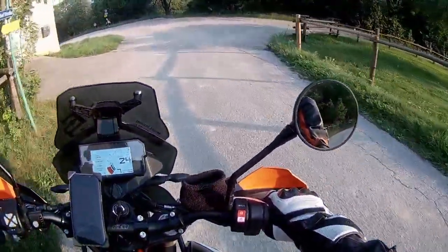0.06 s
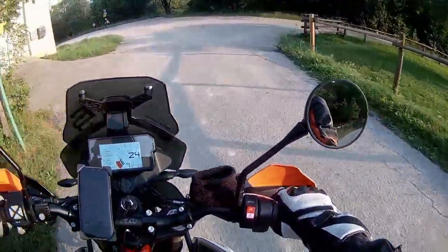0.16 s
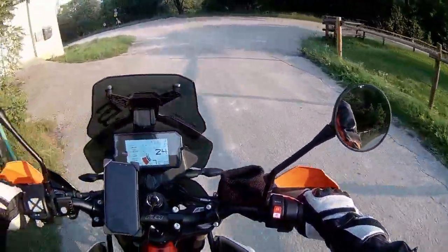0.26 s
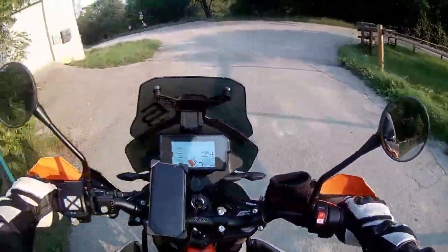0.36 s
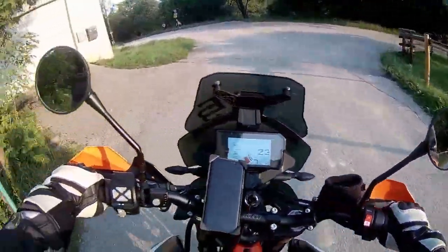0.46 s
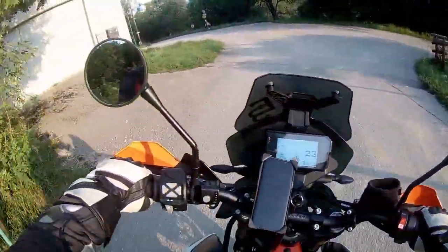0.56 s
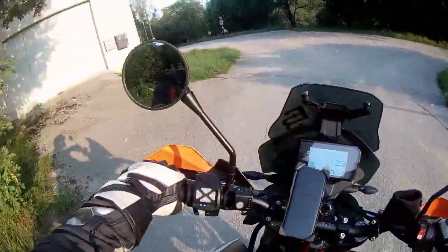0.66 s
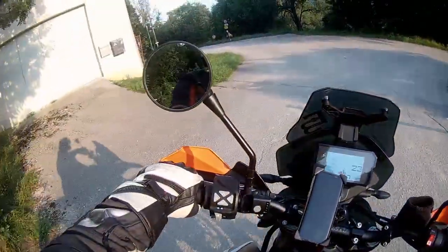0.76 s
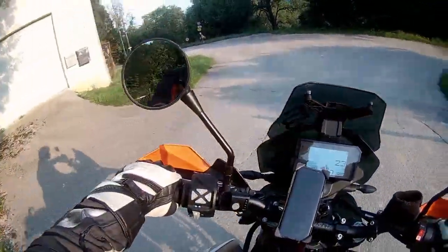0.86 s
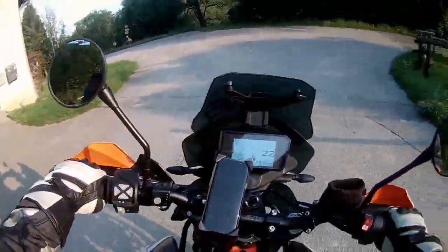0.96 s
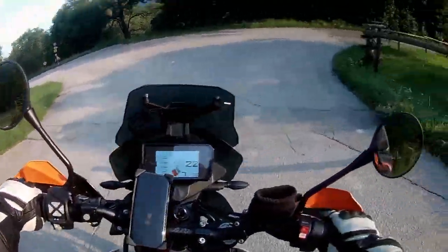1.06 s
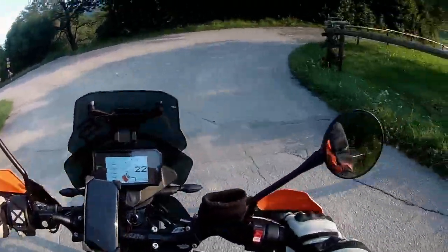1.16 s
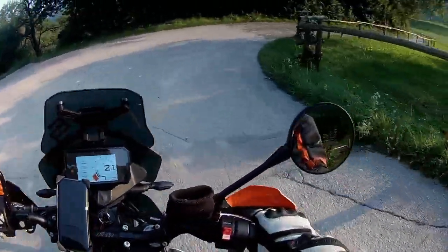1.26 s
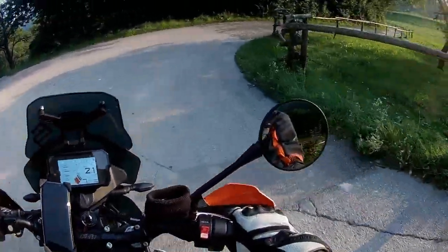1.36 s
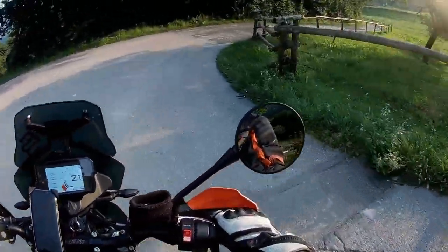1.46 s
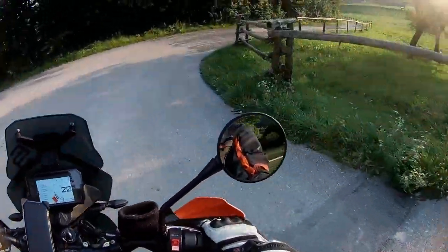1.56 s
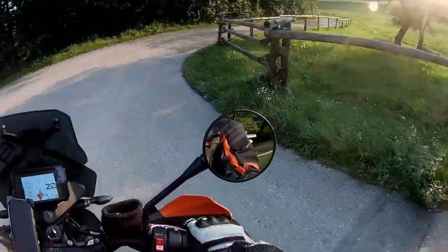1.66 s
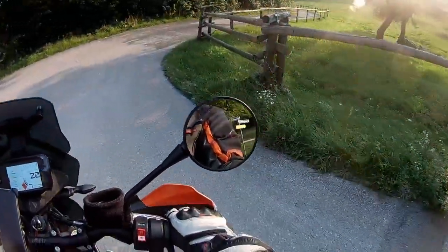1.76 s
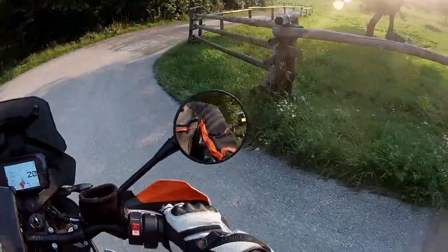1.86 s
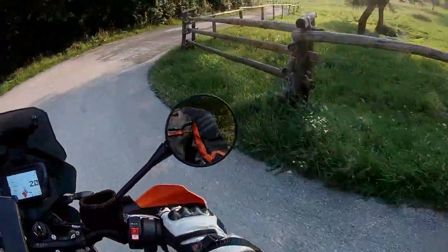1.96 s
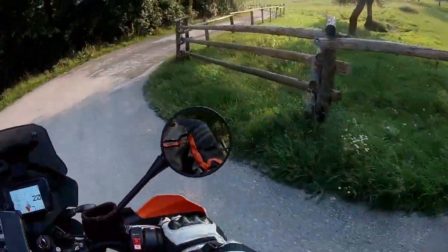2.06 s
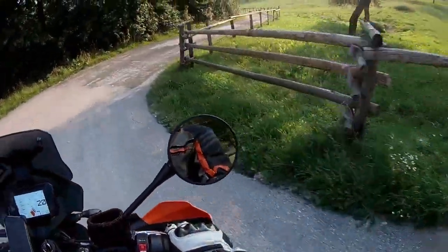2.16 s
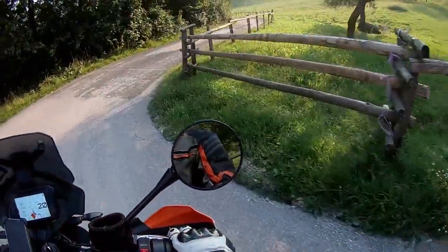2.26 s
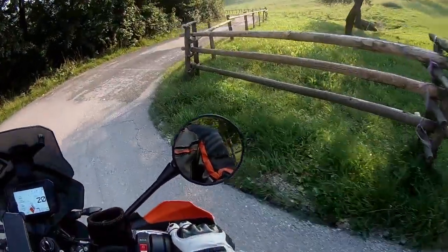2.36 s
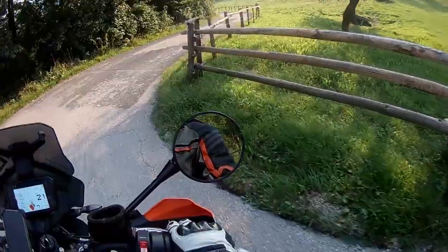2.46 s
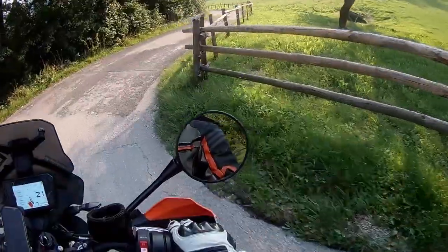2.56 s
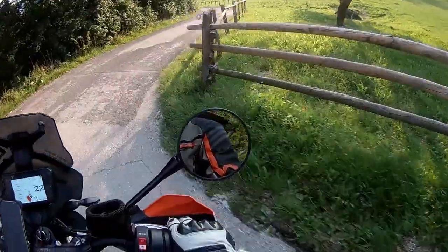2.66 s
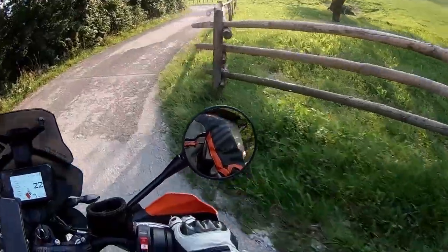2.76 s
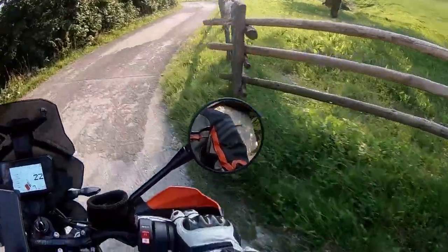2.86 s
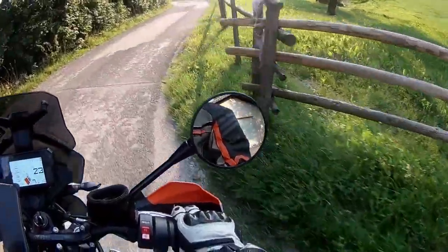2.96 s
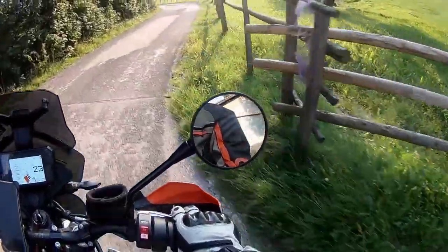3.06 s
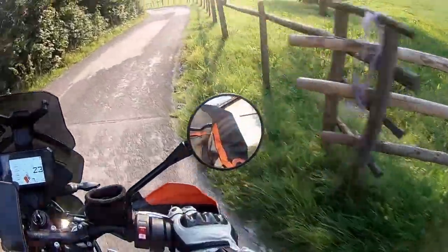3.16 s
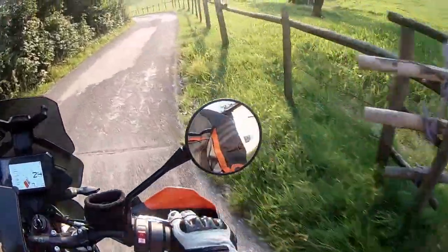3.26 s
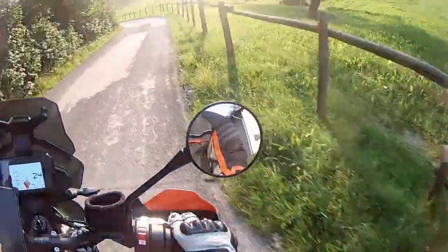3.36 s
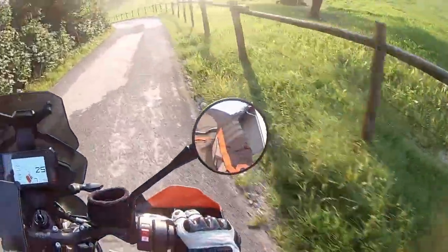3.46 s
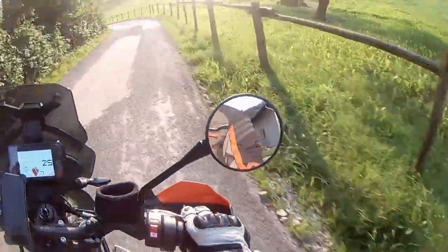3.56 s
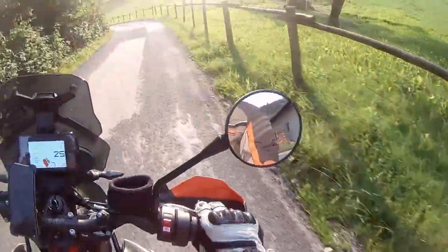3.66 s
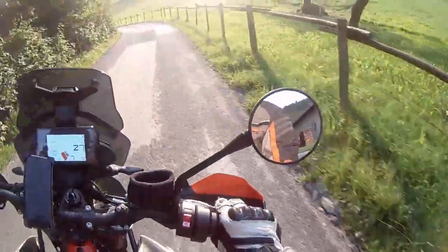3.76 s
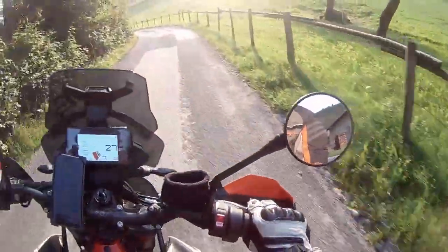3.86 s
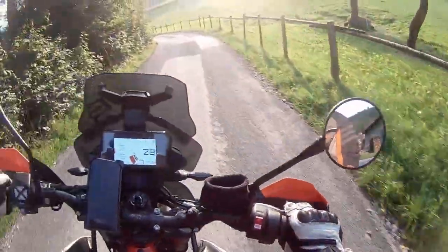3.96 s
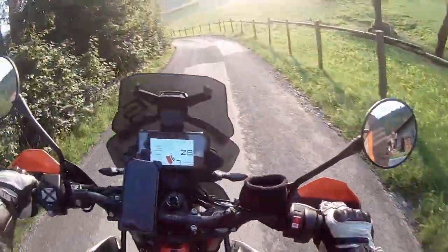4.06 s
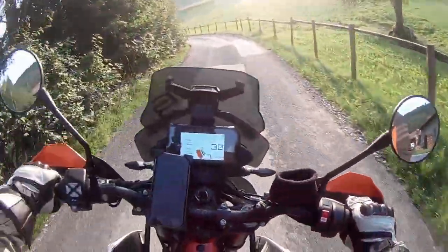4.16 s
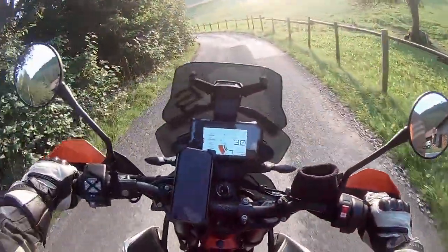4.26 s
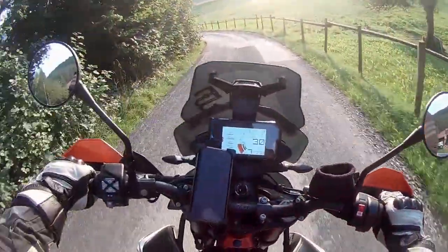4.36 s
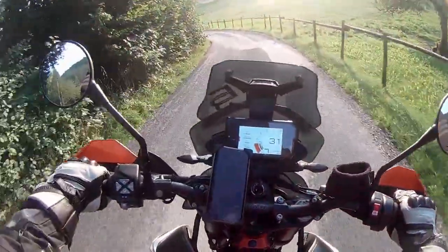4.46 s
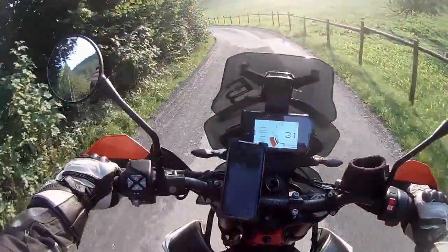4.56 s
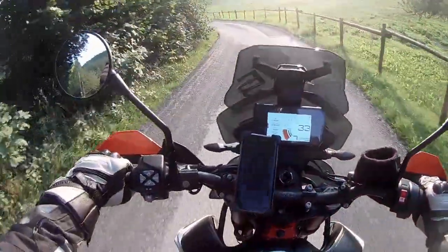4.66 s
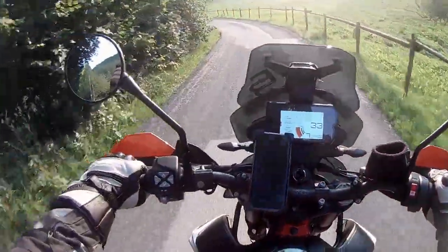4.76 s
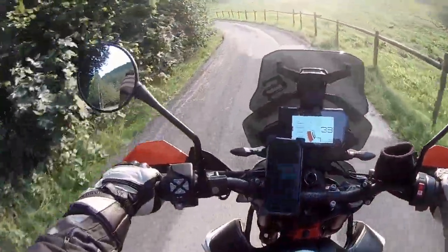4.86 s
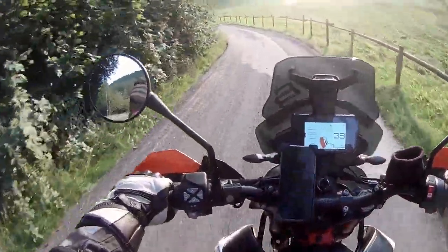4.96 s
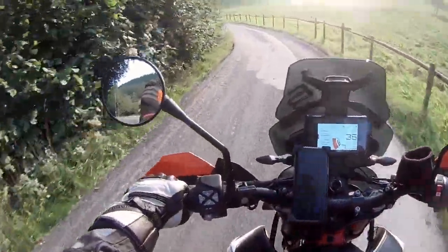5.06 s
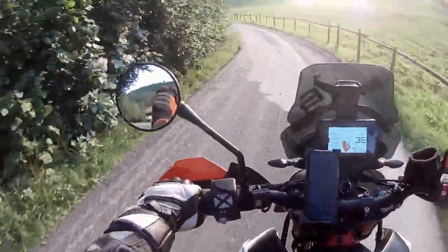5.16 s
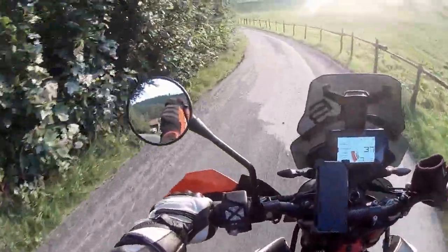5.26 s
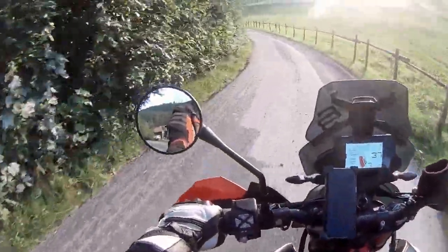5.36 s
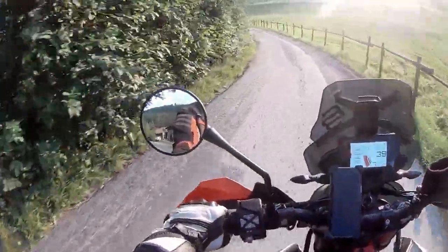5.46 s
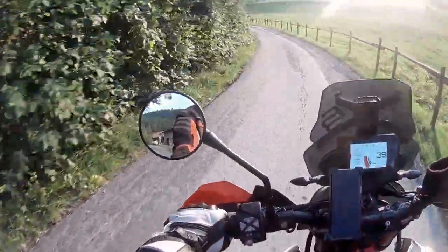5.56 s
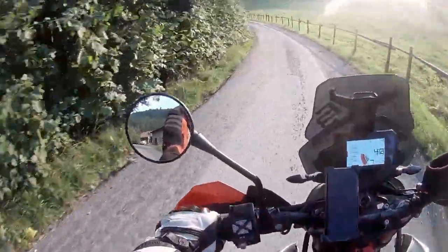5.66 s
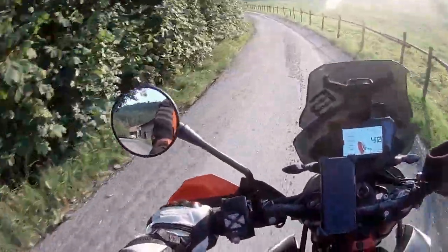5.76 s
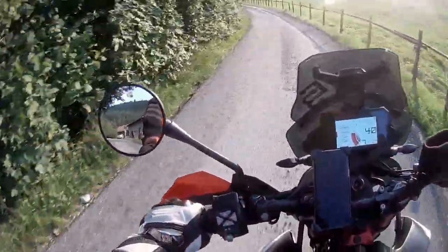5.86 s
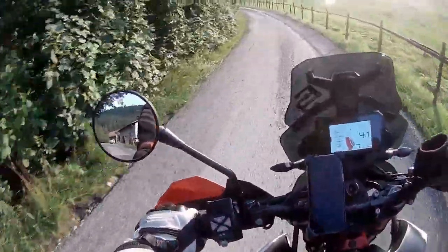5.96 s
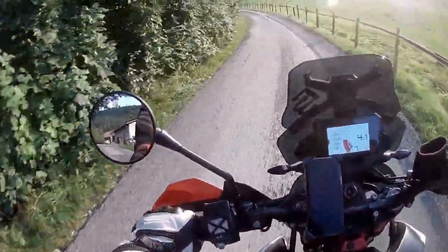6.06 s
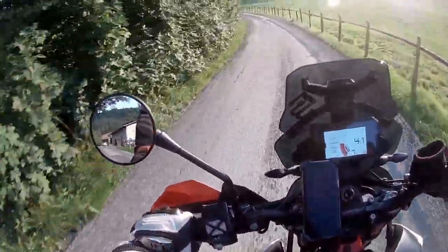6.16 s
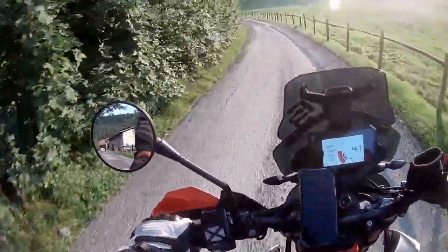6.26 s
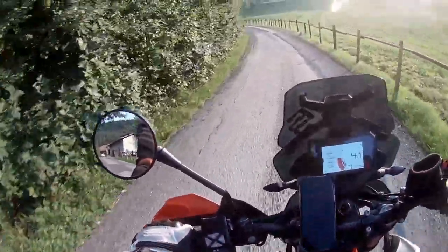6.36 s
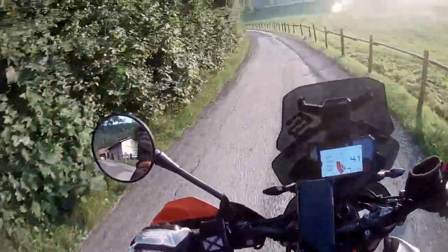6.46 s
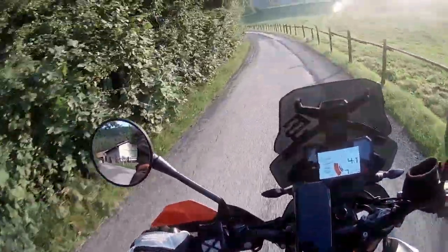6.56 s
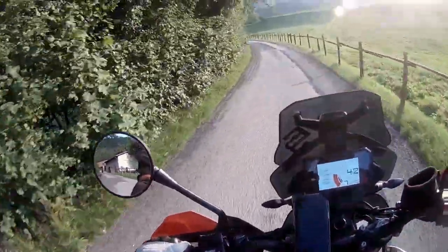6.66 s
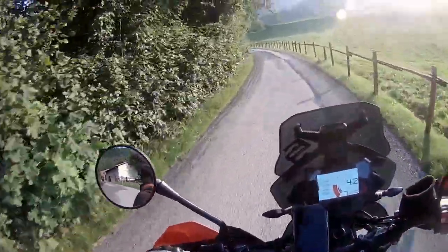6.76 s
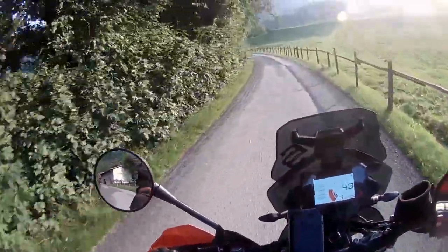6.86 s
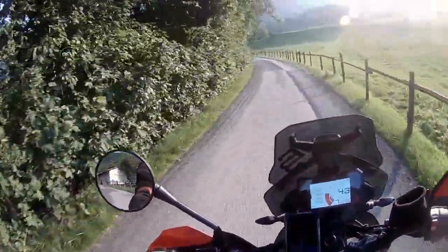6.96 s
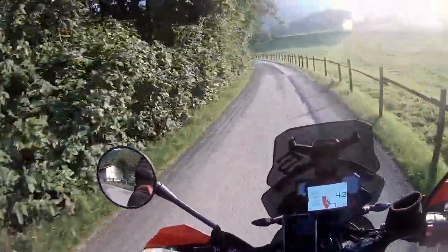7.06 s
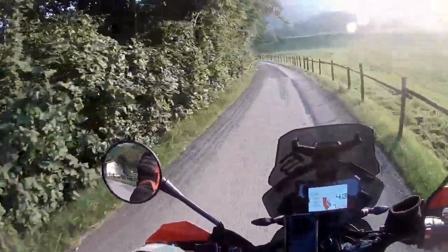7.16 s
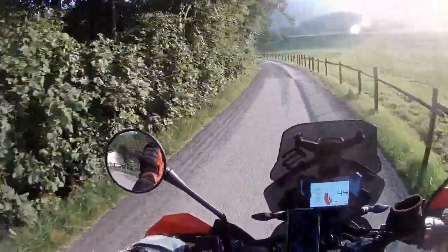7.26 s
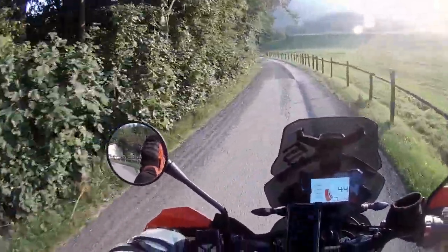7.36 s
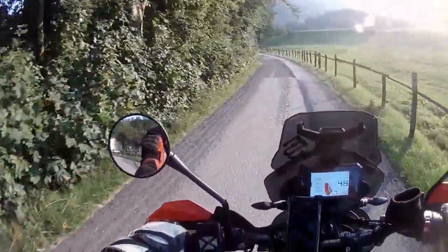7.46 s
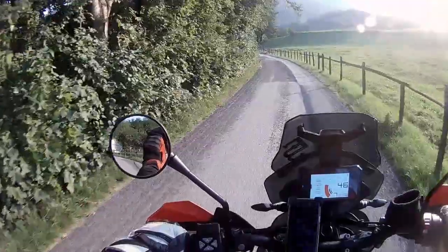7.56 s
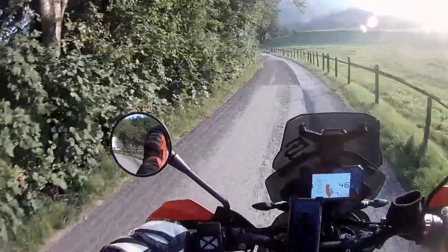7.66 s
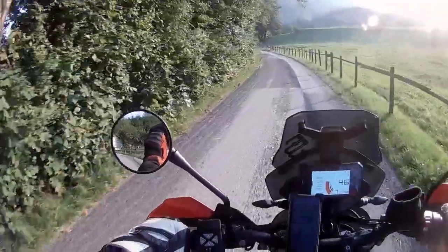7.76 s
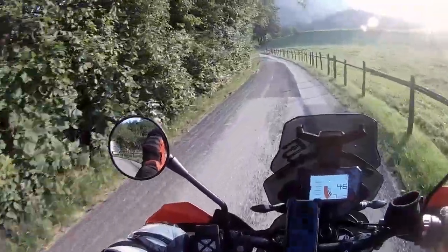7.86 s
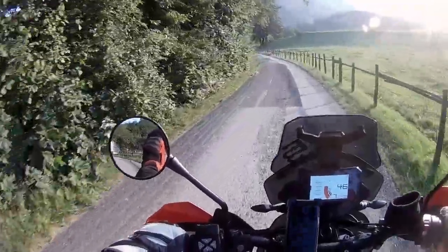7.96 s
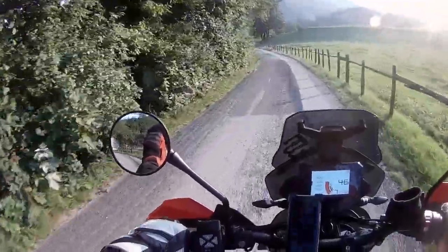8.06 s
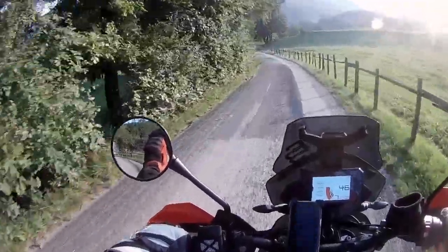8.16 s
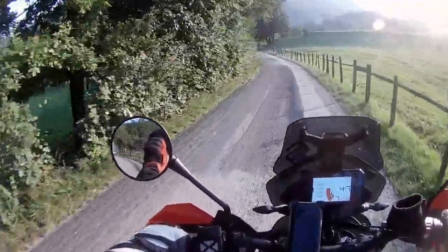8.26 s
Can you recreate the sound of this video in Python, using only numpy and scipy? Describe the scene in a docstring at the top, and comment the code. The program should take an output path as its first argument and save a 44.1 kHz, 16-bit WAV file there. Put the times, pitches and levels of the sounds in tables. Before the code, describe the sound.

Heard from the rider's camera, a motorcycle engine coasts low and clattering, pulls away in one gear, then eases into louder wind and tyre roar.

```python
"""On an asphalt road, a parallel-twin motorcycle rolls through a bend on a closed throttle, then pulls away
in the same gear. Uneven firing drives the exhaust and the airbox; valve gear and gear teeth clatter and whine
with engine speed. Air and tyre noise grow with pace, gusts thump the microphone and fittings rattle.
The ringing housing of the rider's camera colours drone, clatter, most gear tones, tyre roar and air rush."""
import sys
import numpy as np
from scipy import signal
from scipy.fft import rfft, irfft, next_fast_len
from scipy.io import wavfile
from scipy.ndimage import uniform_filter1d

SR = 44100
rng = np.random.default_rng(int(sys.argv[2]) if len(sys.argv) > 2 else 0)


def generate_wav(sig):
    """Save sig (samples, or channels by samples) to the path in sys.argv[1] as 16-bit PCM at SR."""
    pcm = np.round(np.clip(np.atleast_2d(sig).T, -1, 1) * 32767).astype(np.int16)
    wavfile.write(sys.argv[1], SR, pcm)


N = 366030
TIME = np.arange(N) / SR


def from_db(db):
    """Decibels to gain."""
    return 10 ** (np.asarray(db) / 20)


def rms_one(x):
    """Scale to unit power."""
    return x / np.sqrt(np.mean(x ** 2) + 1e-20)


def evened(x, seconds):
    """Hold the running power at one."""
    return x / np.sqrt(uniform_filter1d(x ** 2, int(seconds * SR)) + 1e-12)


def in_time(rows):
    """The columns of a curve at every sample."""
    time_s, *columns = np.transpose(rows)
    return [np.interp(TIME, time_s, column) for column in columns]


def swell(x, centre, width):
    """A Gaussian bell of height one."""
    return np.exp(-.5 * ((x - centre) / width) ** 2)


def bandpass(x, low_hz, high_hz):
    """Second-order Butterworth band-pass."""
    return signal.sosfilt(signal.butter(2, [low_hz, high_hz], "band", fs=SR, output="sos"), x)


def coloured(x, spectrum):
    """Shape a sound by a smooth spectrum, interpolated over log frequency."""
    size = next_fast_len(N)
    hz, db = np.transpose(spectrum)
    log_hz = np.log(np.arange(size // 2 + 1) * SR / size + 1e-3)
    gain = from_db(np.interp(log_hz, np.log(hz), db))
    return irfft(rfft(x, size) * gain, size)[:N]


def noise(spectrum):
    """Random noise with the given spectrum, unit power."""
    return rms_one(coloured(rng.standard_normal(N), spectrum))


def slow_noise(rate_hz):
    """Random wander below the given rate, spread one."""
    lowpass = signal.butter(2, rate_hz, fs=SR, output="sos")
    # the first second, while the filter settles, is dropped
    return rms_one(signal.sosfilt(lowpass, rng.standard_normal(N + SR))[SR:])


def resonate(x, modes):
    """Parallel two-pole resonances with alternating signs."""
    out = 0
    for k, (hz, width_hz, db) in enumerate(modes):
        r = np.exp(-np.pi * width_hz / SR)
        poles = [1, -2 * r * np.cos(2 * np.pi * hz / SR), r * r]
        gain = (-1) ** k * from_db(db) * (1 - r * r) / 2
        out = out + gain * signal.lfilter([1, 0, -1], poles, x)
    return out


# camera housing resonances: (frequency [Hz], width [Hz], lift [dB])
HOUSING_MODES = [(259.7, 60, 7.5), (461, 42, 2), (569, 95, 5.5), (657, 38, -5), (684, 30, 3.5),
                 (824, 180, -4), (1087, 92, 2), (1150, 74, 5.5), (1292, 50, -2.5), (1385, 114, 6),
                 (1495, 64, 4), (1549.4, 122, 10), (1670, 64, -3), (1742, 94, 4.5), (1910, 138, 6.5),
                 (2493, 70, 7), (2557, 220, -7), (2935, 150, 3.5), (3280, 73, -3.5), (3350, 57, 6.5),
                 (3670, 130, -1.5), (3894, 120, 5.5), (4420, 340, 3), (5190, 210, -9), (6010, 220, 11.5),
                 (6130, 110, -12.5), (6800, 760, 1.5)]


def housing(x):
    """The camera's shell and ports lift and hollow narrow bands; unit power."""
    sections = []
    for hz, width_hz, db in HOUSING_MODES:
        lift, damp = from_db(db / 2), np.pi * width_hz / SR
        turn = -2 * np.cos(2 * np.pi * hz / SR)
        zeros = [1 + damp * lift, turn, 1 - damp * lift]
        poles = [1 + damp / lift, turn, 1 - damp / lift]
        sections.append(np.array(zeros + poles) / poles[0])
    return rms_one(signal.sosfilt(sections, x))


SLOW_CYCLES_PER_S = 15  # engine speed in the bend, reference of every level law


def level(law, speed, throttle=0):
    """Level in dB from engine speed and, where the law has a third term, throttle."""
    slow_db, db_per_doubling, *throttle_db = law
    return slow_db + db_per_doubling * np.log2(speed / SLOW_CYCLES_PER_S) + sum(throttle_db) * throttle


def strokes(cycles, angle, uneven):
    """One click each time the engine passes an angle of its cycle, of varying strength."""
    at = np.flatnonzero(np.diff(np.floor(cycles - angle)))
    clicks = np.zeros(N)
    clicks[at] = 1 + uneven * rng.standard_normal(len(at))
    return clicks


def firing(cycles, uneven, second_db):
    """The two cylinders fire 285 and 435 degrees apart, which favours the fifth and tenth orders."""
    first = strokes(cycles, 0, uneven)
    second = strokes(cycles, 285 / 720, uneven)
    return first + from_db(second_db) * second


def partials(cycles, orders, offsets, waver_db, waver_hz):
    """Tones locked to the engine cycle, each offset by some turns and wavering in strength; unit power."""
    out = 0
    for (order, db), offset in zip(orders, offsets):
        gain = from_db(db + waver_db * slow_noise(waver_hz))
        out = out + gain * np.cos(2 * np.pi * (round(order) * cycles + offset))
    return rms_one(out)


# microphone self-noise: (frequency [Hz], relative density [dB])
HISS_SPECTRUM = [(2000, 0), (8000, 0), (11500, -1.5), (14000, 1), (15800, 3.5)]


def microphone_hiss(level_db=-60.8):
    """The microphone's own steady noise."""
    return from_db(level_db) * noise(HISS_SPECTRUM)


# tyre roar, air rush: (frequency [Hz], relative density [dB])
ROAR_SPECTRUM = [(40, 12), (100, 9.5), (170, 5.5), (300, 2), (480, 2), (700, 0.5), (1000, -4), (1600, -41),
                 (5000, -92.5)]
RUSH_SPECTRUM = [(100, -35.5), (500, -19), (850, -16.5), (1050, 1), (1400, 0), (1800, -6), (2300, -9),
                 (2900, -13), (4000, -19), (5200, -27.5), (6900, -36), (8200, -52), (9500, -83.5)]
# their level laws: (level at slow speed [dB], rise per doubling of speed [dB])
ROAR_LAW = (-39.5, 11.63)
RUSH_LAW = (-35, 8.66)
# airflow departure from the level pace gives, also used for buffeting: (time [s], rush [dB], buffeting [dB])
EXPOSURE = [(0, -1, -1), (1.2, 0, -1.5), (1.9, -6.5, 2.5), (2.5, -8.5, 0.5), (3.5, -5.5, -0.5),
            (4.4, 1.5, -3.5), (5.3, -2.5, -2.5), (5.5, -1, 3.5), (6.4, 1, 1), (8.3, 0.5, .5)]


def air_and_tyres(speed):
    """Air streams past the rider and tyres roar on asphalt; eddies make the rush flutter."""
    exposure_db, _ = in_time(EXPOSURE)
    flutter_db = 0.84 * slow_noise(27)
    roar = from_db(level(ROAR_LAW, speed)) * housing(noise(ROAR_SPECTRUM))
    rush = from_db(level(RUSH_LAW, speed) + exposure_db + flutter_db) * housing(noise(RUSH_SPECTRUM))
    return roar + rush


# wind thump: (frequency [Hz], relative density [dB])
GUST_SPECTRUM = [(10, -18), (20, -12), (26.5, 6.5), (33, -7), (48, -7), (80, -6.5), (125, -14.5),
                 (200, -22), (400, -40.5), (900, -92), (3000, -120)]
# level law: (level at slow speed [dB], rise per doubling of speed [dB])
BUFFET_LAW = (-35.5, 13.5)
# strong gusts: (time [s], Gaussian half length [s], lift [dB])
GUSTS = [(1.262, 0.061, 5.5), (2.15, 0.22, 2.5), (3.903, 0.044, 9.5), (4.75, 0.1, 2.5), (5.516, 0.052, 3),
         (5.853, .1, 1.5), (7.267, 0.028, 2), (7.73, 0.088, 5.5), (8.026, 0.1, 3.5)]


def buffeting(speed, lumpy_db=1.0):
    """Eddies thump directly on the microphone, harder with pace and in gusts."""
    _, exposure_db = in_time(EXPOSURE)
    gust_db = sum(db * swell(TIME, at_s, half_s) for at_s, half_s, db in GUSTS)
    lumps_db = lumpy_db * slow_noise(3.9)
    gain = from_db(level(BUFFET_LAW, speed) + exposure_db + gust_db + lumps_db)
    return gain * evened(noise(GUST_SPECTRUM), seconds=0.22)


# loose fittings: (time [s], level [dB], pitch [Hz], Gaussian half length [s])
RATTLES = [(1.827, -47, 3830, .014), (2.798, -44, 2420, 0.029)]


def rattles(width_hz=450):
    """Short bright buzzes as the bike jolts: noise through a doubled resonance."""
    out = 0
    for at_s, db, hz, half_s in RATTLES:
        mode = [(hz, width_hz, 0)]
        buzz = rms_one(resonate(resonate(rng.standard_normal(N), mode), mode))
        out = out + from_db(db) * swell(TIME, at_s, half_s) * buzz
    return out


# level law: (level at slow speed, throttle shut [dB], change per doubling of speed [dB], full throttle adds [dB])
WHINE_LAW = (-47, -10.5, 3.9)
# speeds where the gears sing loudest: (engine speed [cycles/s], width [cycles/s], lift [dB])
GEAR_RESONANCES = [(19.35, 1.45, 5), (22.03, 1.3, 8.5), (25.5, 0.88, 10.5)]
# finer gear's brief whistle: (engine speed [cycles/s], width [cycles/s], level [dB])
FINE_GEAR = (19.1, 0.84, -51.5)


def gear_whine(cycles, speed, throttle, spread_hz=140, low_spread_hz=37, low_mesh_db=1.5):
    """Meshing teeth sing far above the firing rate, smeared by backlash and the crank's surge."""
    fine_order, high_order, low_order = 232, 157, 83
    turn = 2 * np.pi * cycles

    def mesh(order, smear_hz):
        """A tone at one order, broadened by random amplitudes in quadrature."""
        return np.sin(order * turn) * slow_noise(smear_hz) + np.cos(order * turn) * slow_noise(smear_hz)

    lift_db = sum(db * swell(speed, at, width) for at, width, db in GEAR_RESONANCES)
    teeth = mesh(high_order, spread_hz) + from_db(low_mesh_db) * mesh(low_order, low_spread_hz)
    main = from_db(level(WHINE_LAW, speed, throttle) + lift_db) * housing(teeth)
    at, width, fine_db = FINE_GEAR
    fine = from_db(fine_db) * swell(speed, at, width) * mesh(fine_order, spread_hz)
    surge = from_db(3.4 * np.cos(2 * turn))  # twice per engine cycle
    return surge * (main + fine)


# thin tones: (order of the engine cycle, relative level [dB])
DRIVE_TONES = [(17, 0), (18, -6), (34, 7), (37, -3.5), (43, 0.5), (49, -5), (51, -5), (59, -8), (66, 0),
               (74, 0), (76, -2), (78, -4), (83, -7.5)]
# engine casing radiation: (frequency [Hz], gain [dB])
CASING_SPECTRUM = [(200, -15), (470, -15.5), (560, -5.5), (650, -22), (900, -11.5), (1080, 0), (1550, 2),
                   (2000, -3), (2300, -2), (2700, -18), (6000, -59.5)]
# level law: (level at slow speed [dB], rise per doubling of speed [dB])
TONES_LAW = (-41.5, 8.2)


def drive_tones(cycles, speed):
    """Cam chain and gears sing thin gliding tones, swelling with speed and across casing resonances."""
    offsets = rng.random(len(DRIVE_TONES))
    tones = partials(cycles, DRIVE_TONES, offsets, waver_db=1.5, waver_hz=11.0)
    return from_db(level(TONES_LAW, speed)) * housing(coloured(tones, CASING_SPECTRUM))


# valve gear and pistons: (frequency [Hz], relative gain [dB])
CLATTER_SPECTRUM = [(60, -21), (170, -17), (300, -27), (550, -9), (800, -9), (1200, -1.5), (1550, -5.5),
                    (1950, 2), (2300, -6), (2800, -16.5), (4400, -16.5), (5200, -27.5), (6800, -34.5),
                    (8200, -52), (9500, -94)]
# level law: (level at slow speed, throttle shut [dB], rise per doubling of speed [dB], full throttle adds [dB])
CLATTER_LAW = (-36.5, 4.3, 3.16)


def clatter(cycles, speed, throttle, count=24, knocks_db=-5.0):
    """Valves, chain and pistons knock at fixed angles, over a rasp; both throb with the engine."""
    angles = (np.arange(count) + rng.random(count)) / count
    knocks = evened(sum(strokes(cycles, angle, uneven=0.23) for angle in angles), seconds=0.33)
    turn = 2 * np.pi * cycles
    throb = from_db(1.5 * np.cos(2 * turn) + 1.2 * np.cos(3 * turn))
    rasp = rng.standard_normal(N)
    raw = throb * (rasp + from_db(knocks_db) * knocks)
    return from_db(level(CLATTER_LAW, speed, throttle)) * housing(coloured(raw, CLATTER_SPECTRUM))


# first airbox resonance: (frequency [Hz], half width [Hz], throttle shut [dB], full throttle adds [dB])
HONK = (261.5, 21.5, -35.5, 7)


def airbox_honk(cycles, speed, throttle):
    """The tenth intake order swells to a clean note as it glides through the airbox resonance."""
    hz, half_width_hz, shut_db, open_db = HONK
    response = 1 / (1 + ((10 * speed - hz) / half_width_hz) ** 2)
    gain = from_db(shut_db + open_db * throttle + .5 * slow_noise(9))
    return gain * response * np.sqrt(2) * np.sin(2 * np.pi * 10 * cycles)


# exhaust partials: (order of the engine cycle, relative level [dB])
DRONE = [(3, -18), (4, -14), (5, 0), (6, -11), (7, -13), (8, -13), (9, -24), (12, -23), (13, -27),
         (15, -30), (18, -23), (23, -28)]
# exhaust pipe and airbox resonances: (frequency [Hz], width [Hz], level [dB])
PIPE = [(82, 20.5, -3.5), (115, 34, -10)]
AIRBOX = [(259.5, 27, 1.5), (380, 130, -37), (558, 48, -16)]
# level laws: (level at slow speed, throttle shut [dB], change per doubling of speed [dB], full throttle adds [dB])
DRONE_LAW = (-42, -11.5, 19.4)
BURBLE_LAW = (-40, 0.95, -5)
INTAKE_LAW = (-53, 11.3, 4)


def exhaust_and_intake(cycles, speed, throttle):
    """Under load the silencer drones and the airbox growls; on a closed throttle uneven firings burble."""
    # once a cycle every other order opposes the fifth: the twin chugs
    offsets = [.5 * (order != 5) for order, _ in DRONE]
    drone = housing(partials(cycles, DRONE, offsets, waver_db=.5, waver_hz=9))
    puffs = bandpass(firing(cycles, uneven=1.6, second_db=-3.0), 58, 150)
    burble = evened(resonate(puffs, PIPE), seconds=.35)
    gulps = bandpass(firing(cycles, uneven=.1, second_db=-.5), 170, 800)
    growl = evened(resonate(gulps, AIRBOX), seconds=0.23)
    return (from_db(level(DRONE_LAW, speed, throttle)) * drone
            + from_db(level(BURBLE_LAW, speed, throttle)) * burble
            + from_db(level(INTAKE_LAW, speed, throttle)) * growl)


# engine speed: (time [s], four-stroke cycles [1/s])
SPEED = [(0.0, 16.94), (1.1, 15.15), (2.6, 15.05), (3.25, 16.79), (4.3, 21.44), (5.42, 27.7), (5.95, 28.34),
         (6.55, 29.35), (7.0, 30.6), (7.6, 31.74), (8.3, 32.32)]
# rider eases the throttle shut, opens it wide, snaps it nearly shut, then gradually reopens it:
# (time [s], opening [0-1])
THROTTLE = [(0, 0.2), (.65, 0.02), (1.2, 0), (2.35, 0.07), (3.0, 0.87), (5.2, 0.97), (5.6, 0.06),
            (8.3, 0.56)]


def scene():
    """Hiss, airflow, rattles and engine in one channel; in one gear, pace follows engine speed."""
    speed, = in_time(SPEED)
    throttle = np.clip(in_time(THROTTLE)[0], 0, 1)
    # engine phase in cycles, with slight speed jitter
    cycles = np.cumsum(speed * (1 + .0015 * slow_noise(7.27))) / SR
    background = microphone_hiss() + air_and_tyres(speed) + buffeting(speed) + rattles()
    engine = drive_tones(cycles, speed)
    for part in (gear_whine, clatter, airbox_honk, exhaust_and_intake):
        engine = engine + part(cycles, speed, throttle)
    return (background + engine)[None]


def record(dry, cutoff_hz=15800):
    """A steep elliptic low-pass cuts the top."""
    return signal.sosfilt(signal.ellip(12, .1, 90, cutoff_hz, fs=SR, output="sos"), dry)


dry = scene()
out = record(dry)
generate_wav(out)
```